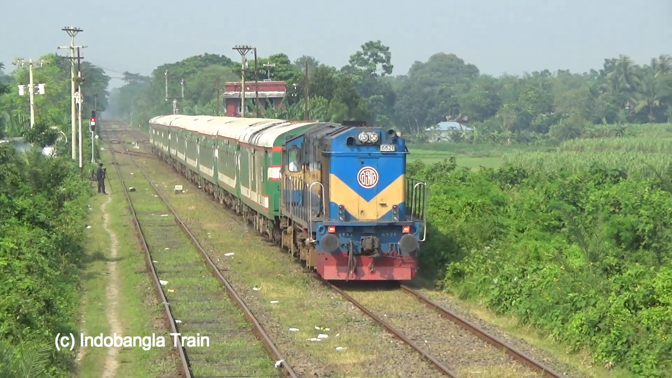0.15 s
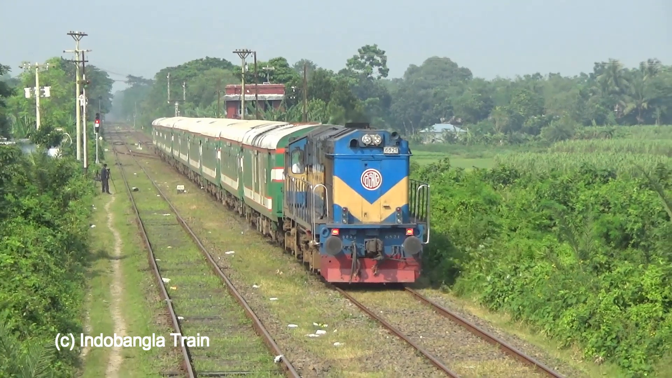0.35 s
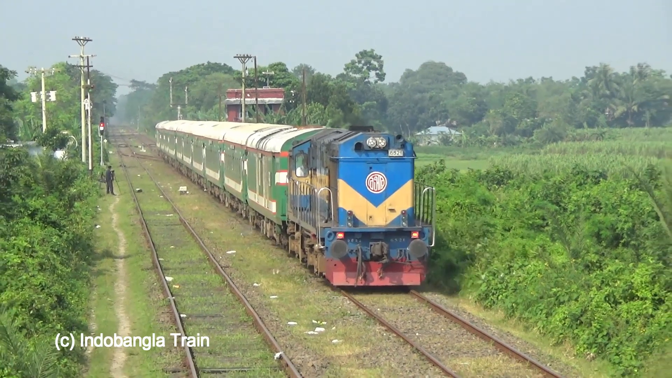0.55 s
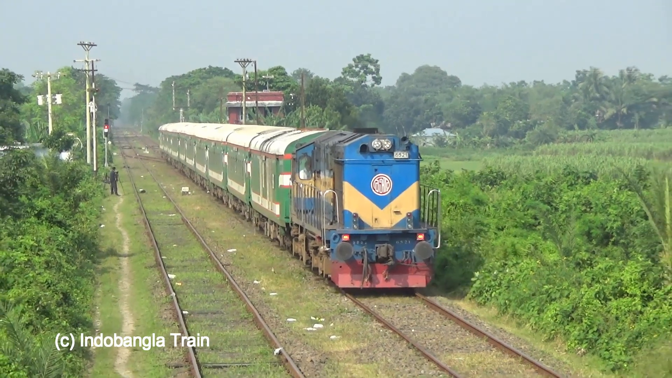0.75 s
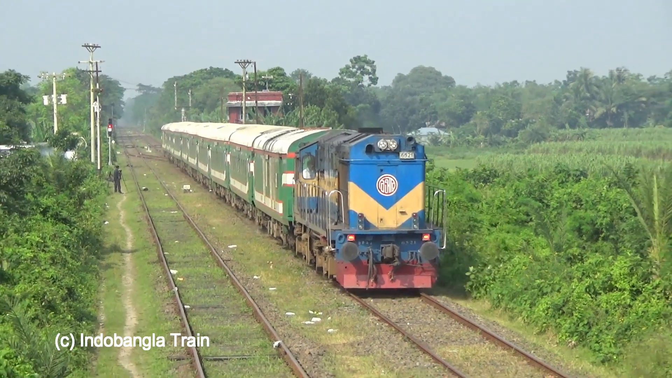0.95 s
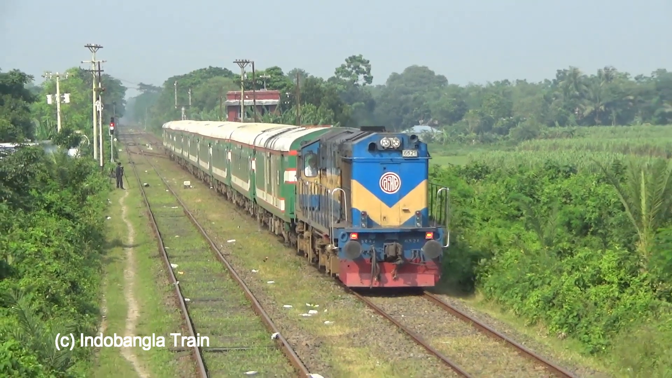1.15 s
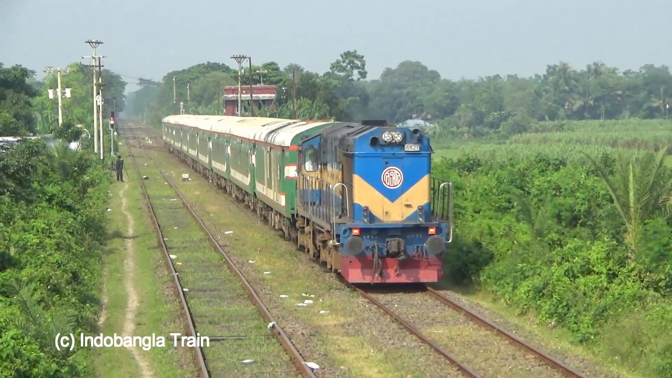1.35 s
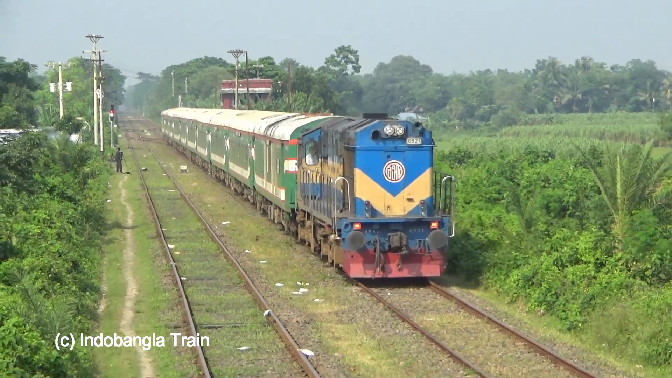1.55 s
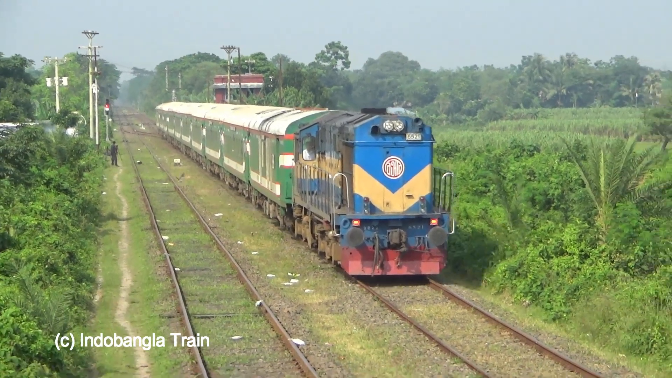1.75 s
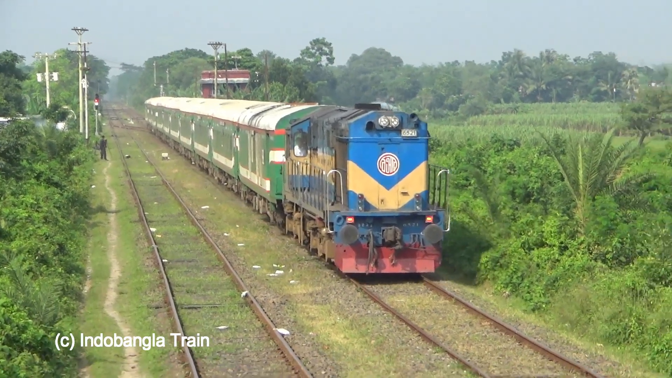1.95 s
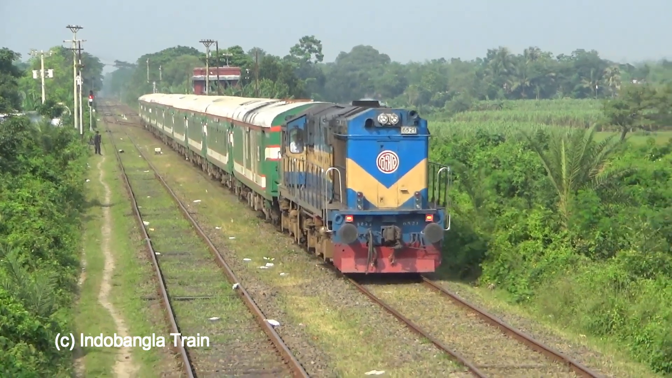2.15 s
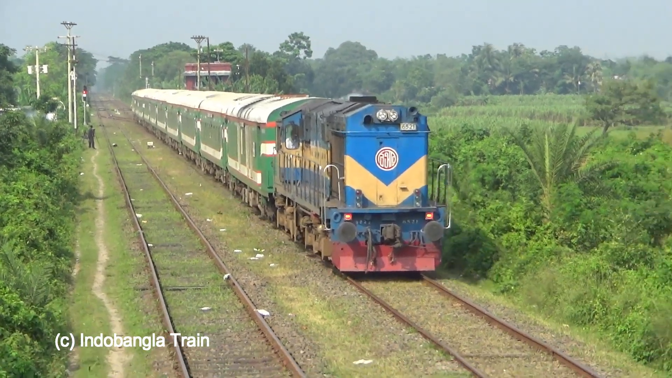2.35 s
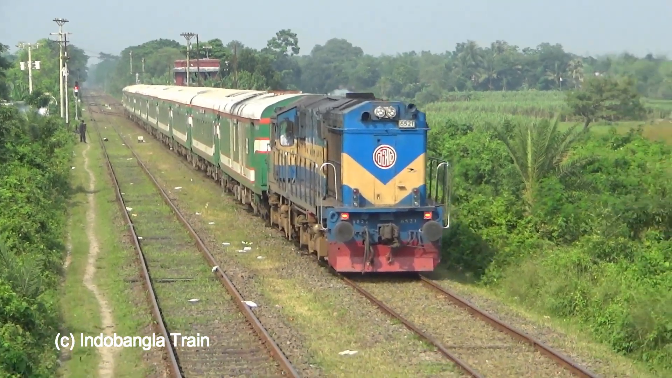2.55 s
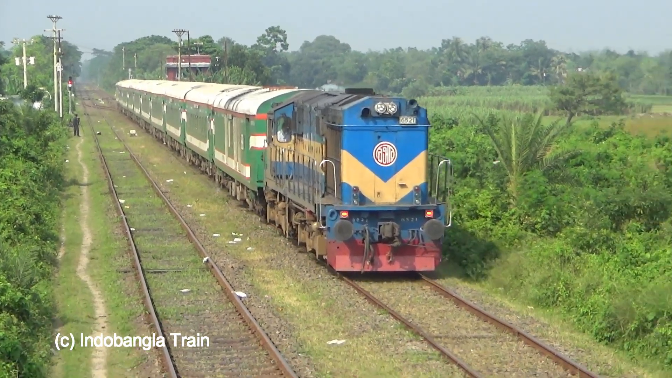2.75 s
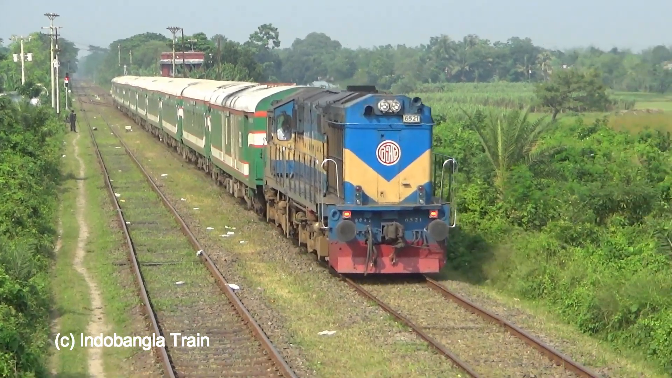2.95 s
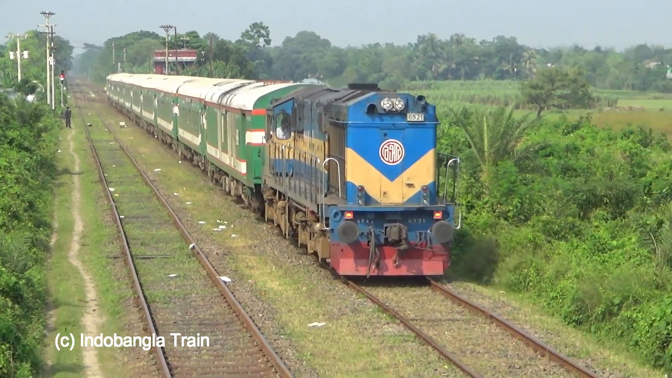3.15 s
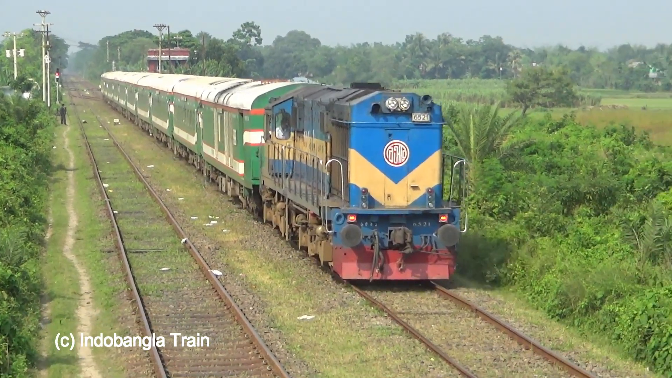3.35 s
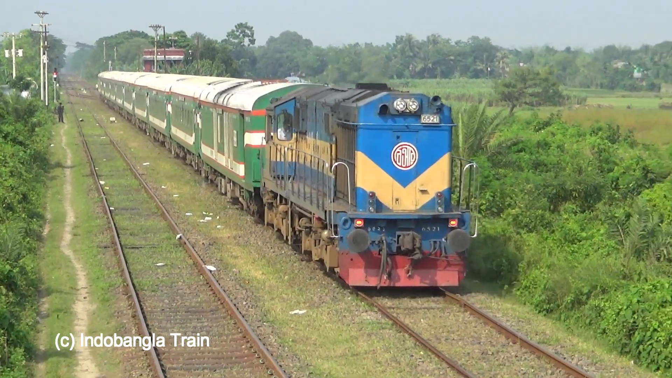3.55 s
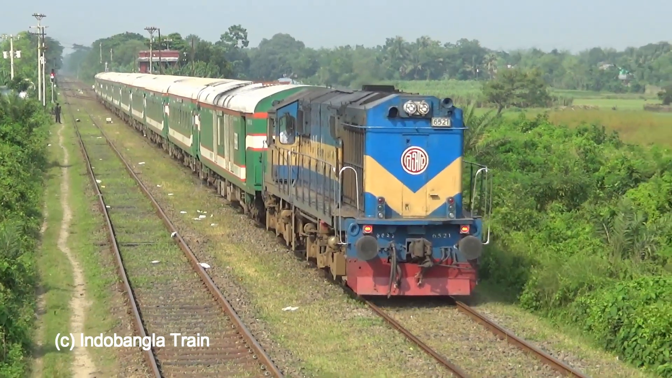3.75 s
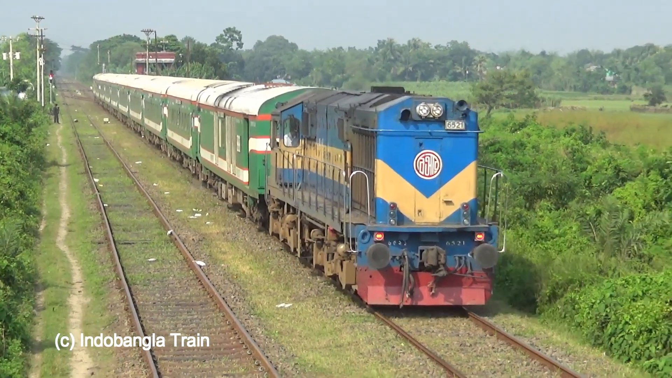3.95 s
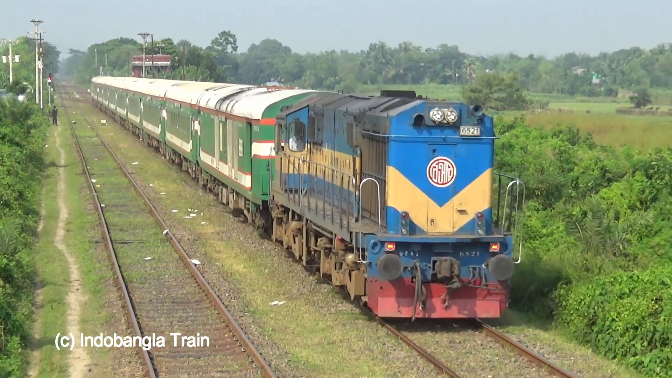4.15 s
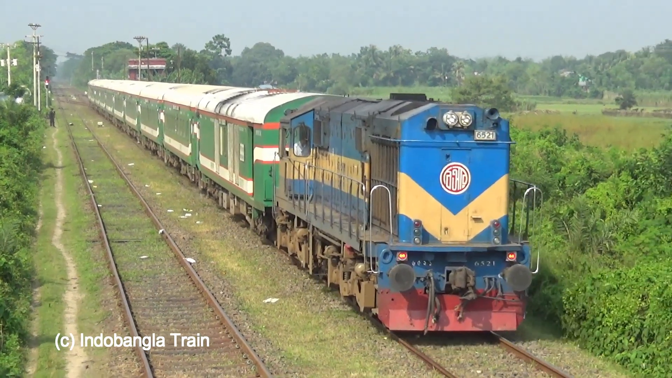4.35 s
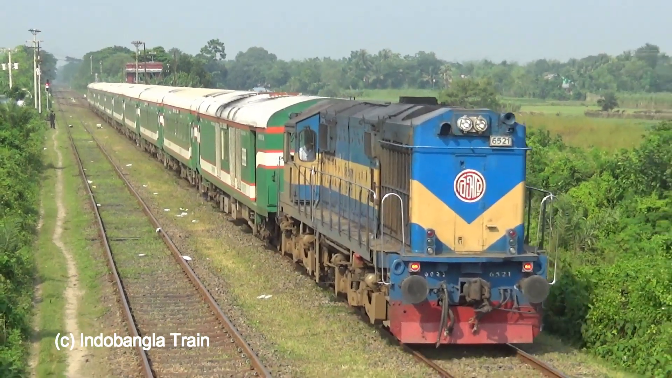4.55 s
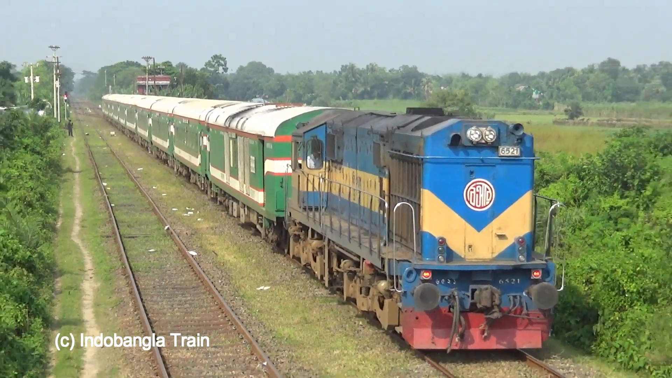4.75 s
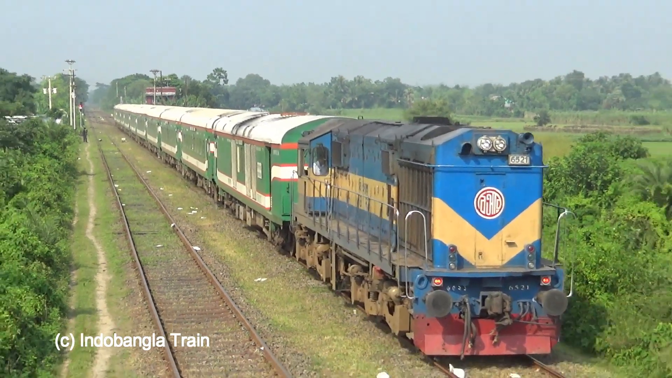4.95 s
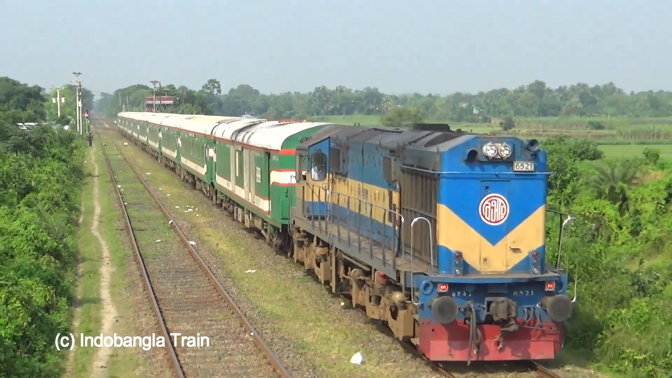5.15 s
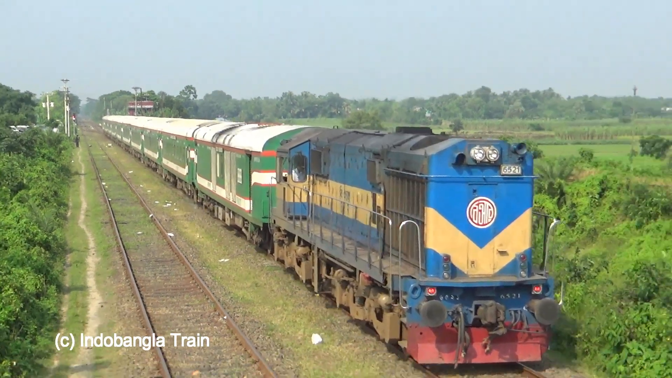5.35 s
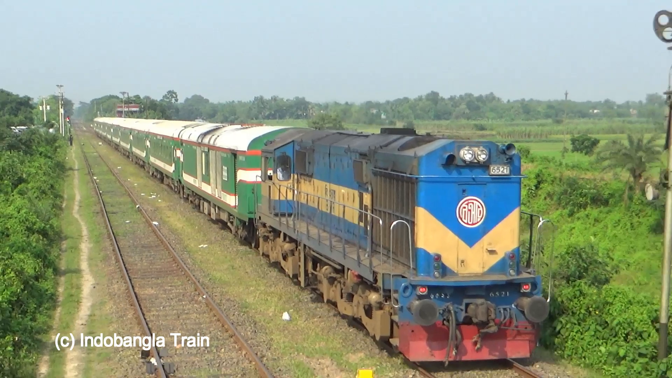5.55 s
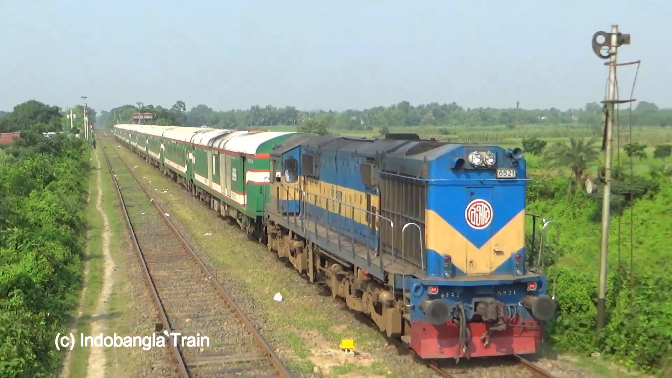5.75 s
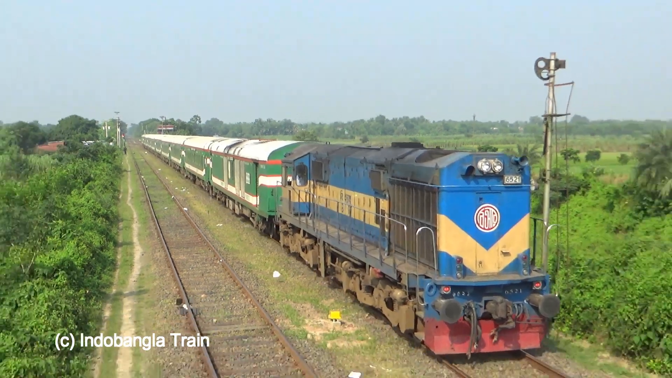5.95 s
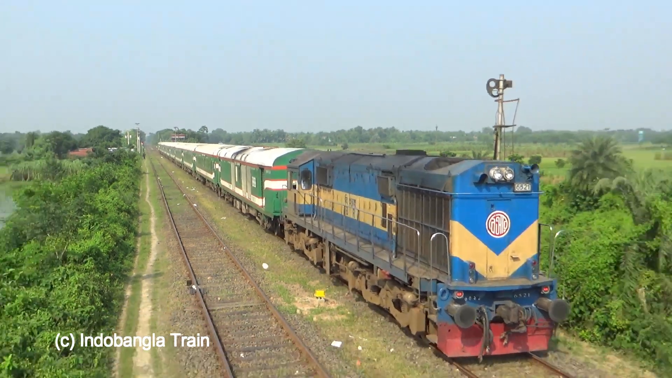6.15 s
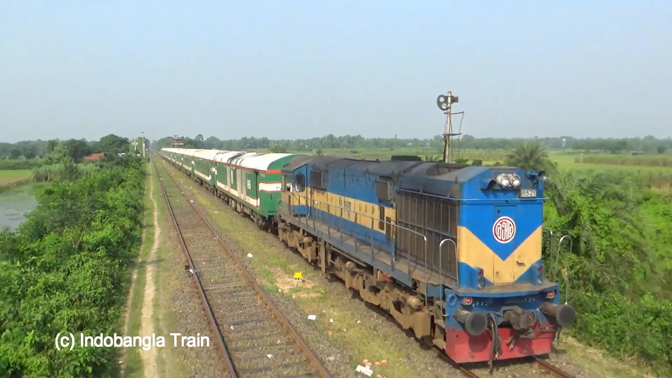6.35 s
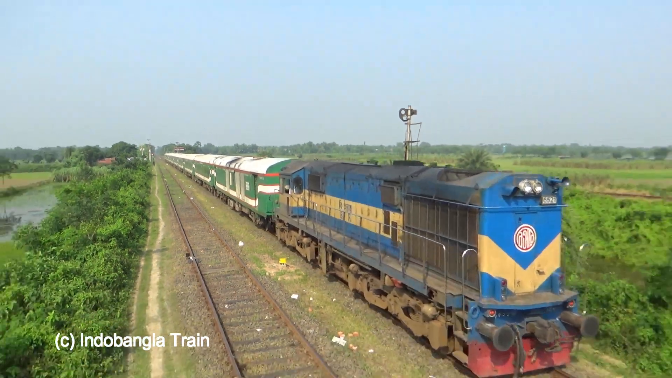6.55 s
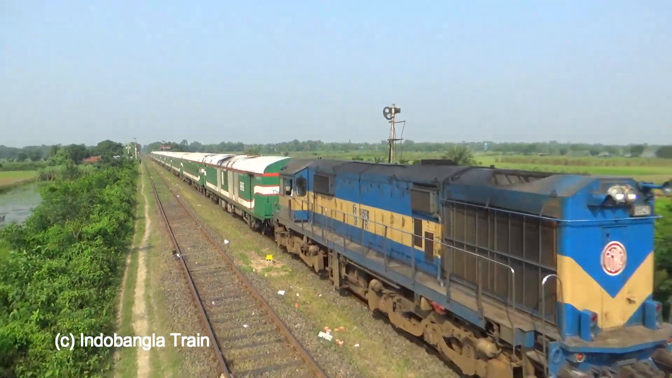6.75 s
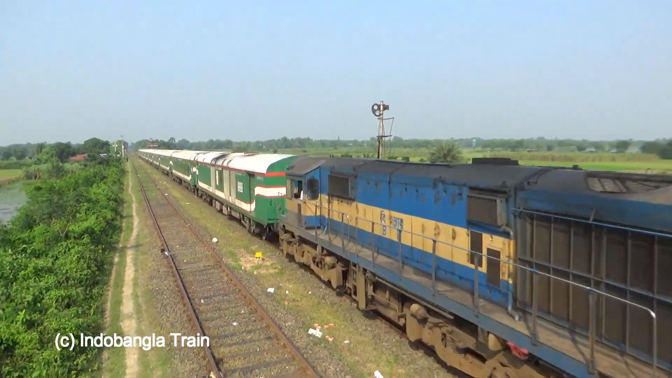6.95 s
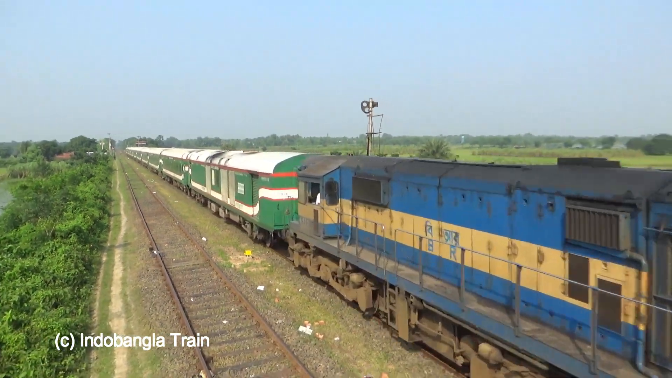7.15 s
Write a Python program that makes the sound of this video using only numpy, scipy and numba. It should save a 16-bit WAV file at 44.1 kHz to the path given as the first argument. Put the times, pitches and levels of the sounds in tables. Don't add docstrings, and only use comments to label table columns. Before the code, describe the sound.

Outdoors beside a railway, a diesel passenger train approaches. Its low engine throbs unevenly while wheel flanges scrape in repeated hissing, ringing bursts, some with thin high squeals. Steel knocks on rail joints and duller bumps punctuate the rolling. Everything grows louder and brighter, with the engine filling out near the end. A nearby stereo microphone hears it increasingly from the right.

```python
import sys
import numpy as np
from scipy import signal
from scipy.fft import rfft, irfft
from scipy.io import wavfile
from scipy.ndimage import uniform_filter1d
from numba import njit

SR = 44100
rng = np.random.default_rng(int(sys.argv[2]) if len(sys.argv) > 2 else 0)


def amplitude_ratio(level_db):
    exponent = np.asarray(level_db, float) / 20
    return 10 ** exponent


def transcribe(u):
    v = np.clip(np.atleast_2d(u).T, -1, 1)
    q = np.round(v * 32767).astype(np.int16)
    wavfile.write(sys.argv[1], SR, q)


N = 321930
TIME = np.arange(N) / SR
HZ = np.fft.rfftfreq(N, 1 / SR) + 1e-3


def over_hz(points):
    hz, value = np.transpose(points)
    return np.interp(np.log(HZ), np.log(np.maximum(hz, 1)), value)


def unit(x):
    return x / np.sqrt(np.mean(x ** 2))


def walk(rate, count=1):
    k = int(SR / rate)
    held = np.repeat(rng.standard_normal((count, N // k + 1)), k, axis=1)
    return 1.46 * uniform_filter1d(uniform_filter1d(held, k), k)[:, :N]


def bands(x, colour, peaks, edges_hz):
    lift = sum(db / (1 + (2 * (HZ - hz) / width) ** 2) for hz, width, db in peaks)
    spectrum = rfft(x) * amplitude_ratio(over_hz(colour) + lift)
    above = [1 / (1 + (hz / HZ) ** 7) for hz in edges_hz] + [0]
    return [unit(irfft(spectrum * (low - high), N)) for low, high in zip(above, above[1:])]


def bearing():
    abreast_s, track_gap_s = 8.086, 0.91
    return track_gap_s / np.maximum(abreast_s - TIME, .3)


def knocks(table, rise_s, t60, share, trim_db, crack_db):
    out, t = np.zeros(N + SR), np.arange(SR // 4) / SR
    f = np.fft.rfftfreq(len(t), 1 / SR) + 1
    crack = amplitude_ratio(crack_db) / (1 + (f / 9500) ** 14) / (1 + (700 / f) ** 4)
    shape = (1 - np.exp(-t / rise_s)) * np.exp(-np.log(1000) * t / t60)
    shape /= shape.max()
    for s, db, hz in table:
        colour = 1 / (1 + ((f / hz - hz / f) / share) ** 2) + crack
        burst = unit(irfft(rfft(rng.standard_normal(len(t))) * colour, len(t)))
        at = int((s - rise_s) * SR)
        out[at:at + len(t)] += amplitude_ratio(db + trim_db) * burst * shape
    return out[:N]


def sleeper_bumps():
    # (time [s], peak level [dB], centre [Hz])
    bumps = [(1.532, -28, 778), (2.064, -17, 726), (3.065, -26, 595), (3.4, -23, 780), (4.087, -16.5, 593),
             (5.105, -12.5, 110), (5.176, -30, 710), (5.682, -14.5, 810), (5.82, -15, 845),
             (6.092, -11, 870), (6.368, -13, 789), (6.628, -13, 751), (6.739, -24, 567), (6.885, -17, 759),
             (1.3, -22, 700), (2.5, -21.5, 700), (3.82, -17, 80), (4.016, -13.5, 2100), (4.04, -15.5, 1810),
             (4.075, -13, 1450), (1.15, -20, 1930), (7.02, -10, 720)]
    return knocks(bumps, rise_s=.006, t60=0.13, share=0.34, trim_db=-10, crack_db=-38)


def rail_joints():
    # (time [s], peak level [dB], centre [Hz])
    joints = [(0.0394, -25.5, 1540), (0.7238, -30, 2250), (0.9694, -16, 3740), (1.0495, -12, 3000),
              (1.1047, -11, 3000), (1.287, -22, 3110), (1.399, -16, 3740), (1.9345, -20, 2310),
              (2.5321, -15, 3620), (3.0784, -16.5, 1500), (3.165, -19, 3860), (4.0876, -5.5, 2120),
              (4.1404, -8, 2330), (4.2288, -16.5, 1530), (5.0719, -18, 3970), (5.8246, -20, 1460),
              (6.1677, -15, 2480), (7.1687, -10.5, 1500), (7.2794, -17, 3860)]
    return knocks(joints, rise_s=.0065, t60=0.22, share=0.76, trim_db=-9.0, crack_db=-3.5)


def squeals():
    # (start [s], length [s], pitch [Hz], peak level [dB], width [Hz])
    squeal_list = [(1.94, 0.434, 5410, -23, 3), (2.58, 0.41, 6000, -30, 9), (1.93, .5, 5250, -21, 300),
                   (2.56, .6, 5260, -22.5, 340), (1.92, .52, 4490, -32, 110), (3.93, 0.18, 4490, -34, 120),
                   (4.27, 0.26, 12545, -31, 70), (2.49, .3, 3860, -29, 270), (4.8, .42, 3910, -32, 130),
                   (6.11, .2, 3845, -32, 250), (1.35, 0.6, 4470, -45, 83), (5.4, 0.21, 2418, -28, 240),
                   (6.2, .32, 6220, -31, 350), (6.9, 0.14, 9600, -31, 140), (7.04, .16, 9600, -26.5, 260),
                   (4.74, .46, 2300, -33.5, 150), (1.91, 0.086, 2600, -29, 200)]
    swell_share, swell_round = 0.36, 1.35
    out = np.zeros(N)
    for s, length, hz, db, width_hz in squeal_list:
        start, end = int(s * SR), min(int((s + length) * SR), N)
        count = end - start
        slow = signal.butter(2, width_hz / 2, fs=SR, output="sos")
        wander = [1, 1j] @ signal.sosfilt(slow, rng.standard_normal((2, SR)))[:, -count:]
        wander /= np.abs(wander) ** np.clip(1 - width_hz / 40, 0, .9)
        tone = unit(np.real(wander * np.exp(2j * np.pi * hz * np.arange(count) / SR)))
        place = np.interp(np.linspace(0, 1, count), [0, swell_share, 1], [0, np.pi / 2, np.pi])
        out[start:end] += tone * amplitude_ratio(db) * np.abs(np.sin(place)) ** swell_round
    return out


def rubs():
    # (start [s], hold [s], hiss level [dB], grit over the hiss [dB], let-go speed [dB/s])
    rub_list = [(-.05, .1, -38, -5, 55), (.155, 0.039, -35, -2, 65), (0.197, 0.19, -28.5, -1.5, 140),
                (0.709, 0.11, -27.5, -10, 45), (0.848, 0.29, -30.5, 0, 140), (1.19, .095, -30, -4, 65),
                (1.27, 0.092, -24.5, 2, 109), (1.51, .35, -41.5, 5, 65), (1.872, .045, -32, -5, 65),
                (1.916, 0.33, -23, -2, 79), (2.43, 0.08, -31, -6, 65), (2.497, .4, -21, -3, 61),
                (3.132, 0.056, -27, -4, 138), (3.23, .76, -25.5, -12, 45), (4.006, .17, -29.5, -4, 95),
                (4.177, .44, -20, -12, 95), (4.7, .43, -20, -11.5, 62), (5.218, .37, -19.5, -12.5, 75),
                (6.015, .28, -22, -13, 70), (6.115, .085, -27.5, 1.5, 85), (6.665, 0.22, -29, -9.5, 55),
                (7.055, 0.078, -31, -1, 125), (7.16, .05, -27.5, -1, 127), (7.25, 0.11, -21, -13, 63)]
    near_db = 20 * np.log10(bearing() / bearing()[0])
    rolling_db = np.array([-41.5, -46.5, -43.5, -63])
    rolling_growth = [0.71, 0.63, 0.58, .45]
    power = amplitude_ratio(rolling_db[:, None] + np.outer(rolling_growth, near_db)) ** 2
    for s, hold, db, grit_db, fall in rub_list:
        on = slice(max(int(s * SR), 0), int((s + hold + 40 / fall) * SR))
        age = TIME[on] - s
        smooth = np.clip(-grit_db / 12.0, 0, 1) * np.clip(near_db[on.start] / 6.7, 0, 1)
        attack_s = 0.026 + 0.096 * smooth
        rise = np.clip(age / attack_s, 0, 1) ** np.array([[1], [1], [1], [.6]])
        sag_db = 10.5 * np.minimum(age, .45) * np.clip(1.5 + grit_db / 7, -.8, 1)
        grind_db = -10 + 0.98 * grit_db - sag_db + 6.5 * np.exp(-age / 0.06)
        let_go_db = fall * np.maximum(age - hold, 0)
        flare_db = 9.5 * np.clip(-grit_db / 11, 0, 1) * np.exp(-age / 0.14)
        fizz_db = -13.5 + (1.4 - 1) * (db + 20) + flare_db
        fizz_db += (1 - 0.6) * let_go_db
        parts_db = np.array([grind_db, grit_db - sag_db, 0 * age, fizz_db])
        power[:, on] += (rise * amplitude_ratio(db - let_go_db + parts_db)) ** 2
    return 10 * np.log10(power)


@njit
def ring(x, hz, width, gain, step):
    out = np.zeros(len(x))
    for m in range(len(hz)):
        p, z = np.exp((2j * hz[m] - width[m]) * np.pi / SR), 0j
        g = np.sqrt(width[m])
        for i in range(len(x)):
            z = z * p + x[i]
            k = i // step
            share = gain[m, k] + (gain[m, k + 1] - gain[m, k]) * (i % step) / step
            out[i] += g * z.imag * share
    return out


def scrape():
    scrape_edges_hz = [1100, 2900, 5500, 11500, 13800]
    # (frequency [Hz], level per Hz [dB])
    scrape_colour = [(530, -31), (900, 8.5), (1100, -7), (1470, -1.5), (1820, -6), (2240, -4), (3480, -6),
                     (3830, -8), (4870, -5), (8550, -4), (10400, -2), (12800, -11), (15800, -17)]
    # (frequency [Hz], width [Hz], level over the hiss [dB])
    rail = [(1460, 130, 4.5), (2137, 680, 5.5), (3490, 110, -4.5), (3840, 200, 5), (4510, 89, 6.5),
            (4850, 140, -4.5), (6200, 140, 3), (8420, 1100, 3.5), (9730, 320, 3.5)]
    bite_starts = (rng.random(N) < 45 / SR) * rng.random(N)
    bites = signal.lfilter([1], [1, -np.exp(-1 / (0.02 * SR))], bite_starts)
    grain_db = 0.77 * rng.exponential(size=N) + 0.53 * walk(90)[0] + 1.8 * (bites - bites.mean())
    grains = rng.standard_normal(N) * amplitude_ratio(grain_db)
    place, spread = (np.arange(170) + rng.random(170)) / 170, rng.random(170)
    catch = amplitude_ratio(5.0 * np.clip(rng.standard_normal((170, N // 4500 + 2)), -3, 1.25))
    mode_hz, mode_width_hz = 620 + 14900 * place ** 1.6, 15 + 40 * spread + 70 * place
    modes = ring(grains, mode_hz, mode_width_hz, catch, 4500)
    parts = bands(unit(grains) + unit(modes), scrape_colour, rail, scrape_edges_hz)
    grind_db, ring_db, hiss_db, fizz_db = rubs()
    air_db = -21 + 11.5 * (1 + np.tanh((TIME - 4.165) / .03)) / 2
    levels_db = (grind_db, ring_db, hiss_db, fizz_db, fizz_db + air_db)
    return sum(amplitude_ratio(db) * part for db, part in zip(levels_db, parts))


def locomotive():
    # (time [s], level [dB])
    loco = [(0.0, -36), (1.02, -36.5), (1.04, -31.5), (2.77, -32), (2.97, -27.5), (3.88, -29.5),
            (4.15, -23), (4.37, -35.5), (4.74, -26.5), (4.9, -33), (5.18, -24.5), (5.35, -31.5), (6.1, -21),
            (6.16, -28), (6.28, -20.5), (7.08, -15.5), (7.26, -17.5), (7.3, -38)]
    # (frequency [Hz], level per Hz [dB])
    loco_colour = [(12, -52), (20, -31), (42, -11), (141, -5), (184, -1.5), (243, -3), (284, -1.5),
                   (316, 0), (357, -7), (506, -12), (613, -6.5), (756, -6), (1090, -19), (1300, -21),
                   (1690, -19.5), (2860, -120)]
    # (frequency [Hz], width [Hz], level over the roar [dB])
    exhaust = [(281, 44, 6), (211.6, 40, 3), (710, 83, -2)]
    parts = bands(rng.standard_normal(N), loco_colour, exhaust, [15, 130, 400])
    throb_db = walk(28, count=3) + np.array([[1.6], [.4], [.8]]) * walk(7.9, count=3) + 0.67 * walk(6)
    level_db = np.interp(TIME, *np.transpose(loco))
    rumble_db = -39.5 + 0.54 * (level_db + 31)
    exhaust_db = level_db - 1
    body_db = -36.5 + 0.68 * (level_db + 30) + 5.5 * bearing() ** 3
    levels_db = np.array([rumble_db, exhaust_db, body_db]) + throb_db
    return np.sum(amplitude_ratio(levels_db) * parts, axis=0)


def two_ports(train):
    # (frequency [Hz], left's lead [rad])
    port_phase = [(30, -.3), (90, -0.38), (250, -1.14), (400, -1.57), (600, -0.84), (860, -1.52),
                  (1300, -0.54), (2200, -0.65), (4000, -0.11), (15000, 0.29)]
    # (frequency [Hz], left minus right [dB])
    port_balance = [(30, -.5), (100, -2), (400, -2.5), (900, -2), (1300, -3.5), (2300, -4), (4000, -2),
                    (7000, -2), (15000, 1.5)]
    # (frequency [Hz], level [dB])
    scatter = [(30, -22), (300, -16.5), (700, -28), (2200, -24), (3000, -23), (4200, -36), (5300, -11),
               (7000, -14), (10000, -19), (15000, -6)]
    ratio = amplitude_ratio(over_hz(port_balance)) * np.exp(1j * over_hz(port_phase))
    direct = irfft(rfft(train) * (ratio - 1) / (ratio + 1), N)
    smear = rng.standard_normal(900) * np.exp(-np.arange(900) / 200)
    echo = signal.fftconvolve(train, smear / np.linalg.norm(smear))[:N]
    echo = irfft(rfft(echo) * amplitude_ratio(over_hz(scatter)), N)
    echo_gain = bearing() ** 0.89 * amplitude_ratio(1 + 3.2 * walk(3.81)[0])
    side = bearing() * direct + echo_gain * echo
    return np.array([train + side, train - side])


def scene():
    return two_ports(sleeper_bumps() + rail_joints() + squeals() + scrape() + locomotive())


def roll_off(x):
    return signal.sosfilt(signal.butter(12, 15900, fs=SR, output="sos"), x)


def record(dry):
    return roll_off(np.tanh(1.031 * dry) / 1.168)


dry = scene()
out = record(dry)
transcribe(out)
```